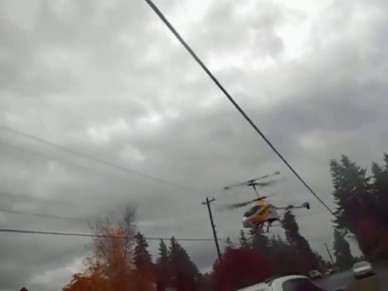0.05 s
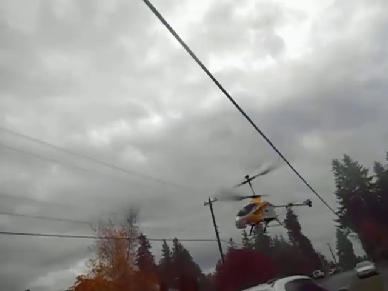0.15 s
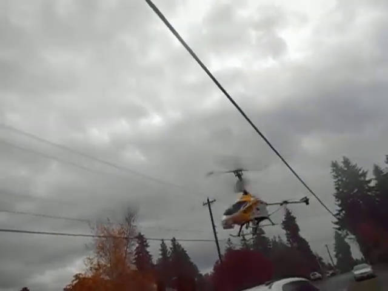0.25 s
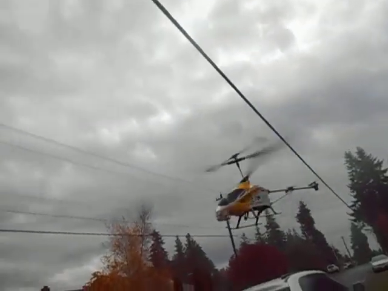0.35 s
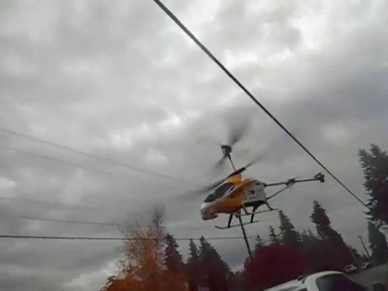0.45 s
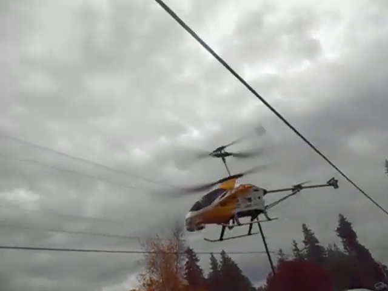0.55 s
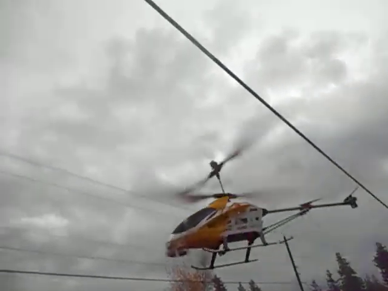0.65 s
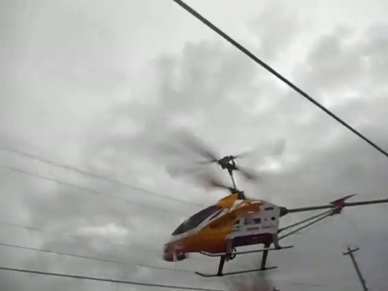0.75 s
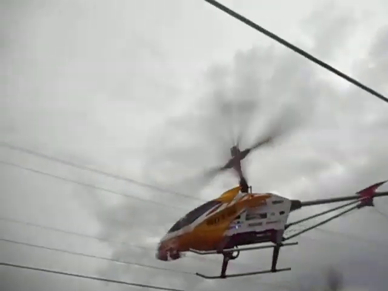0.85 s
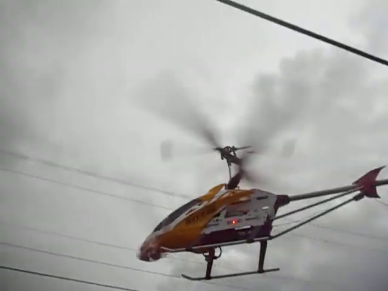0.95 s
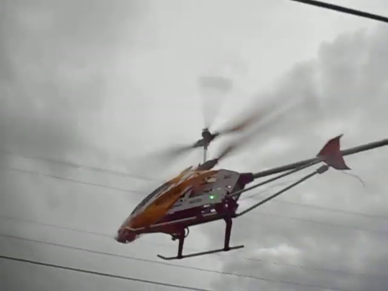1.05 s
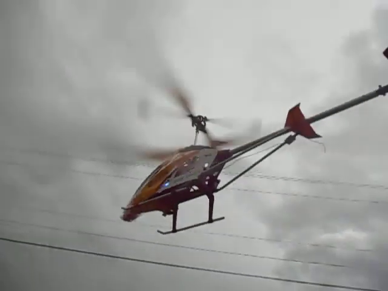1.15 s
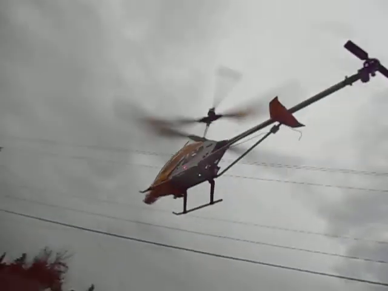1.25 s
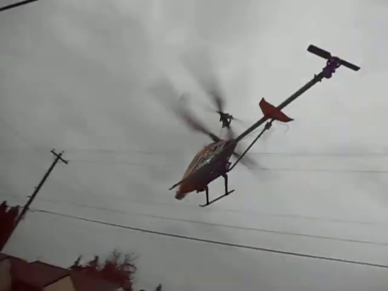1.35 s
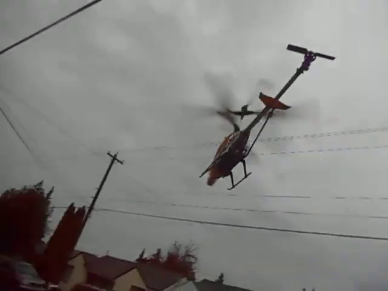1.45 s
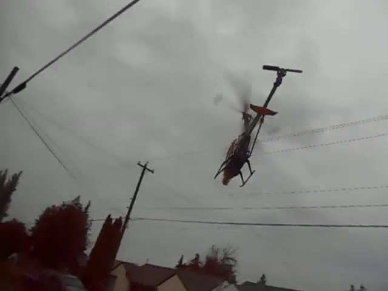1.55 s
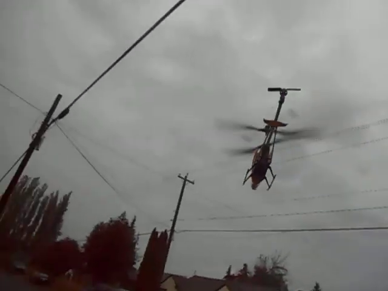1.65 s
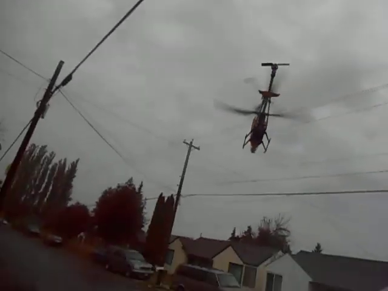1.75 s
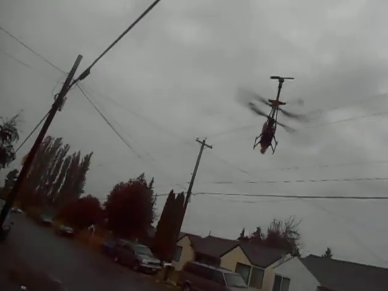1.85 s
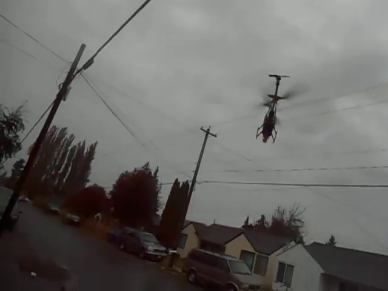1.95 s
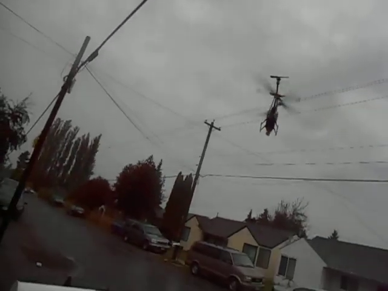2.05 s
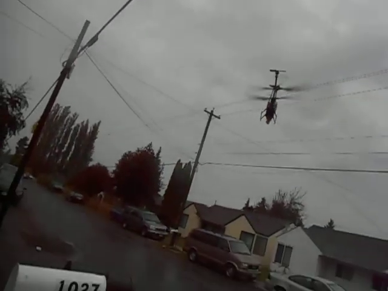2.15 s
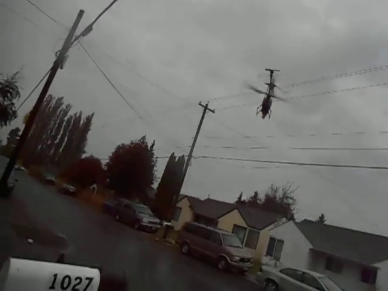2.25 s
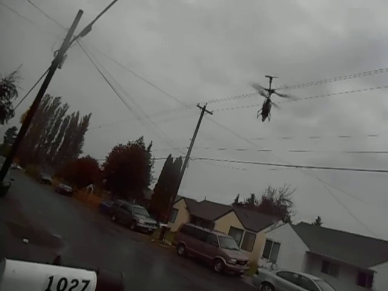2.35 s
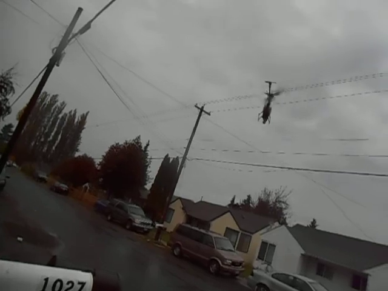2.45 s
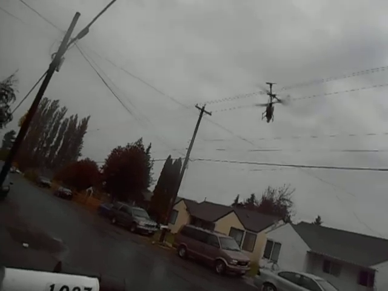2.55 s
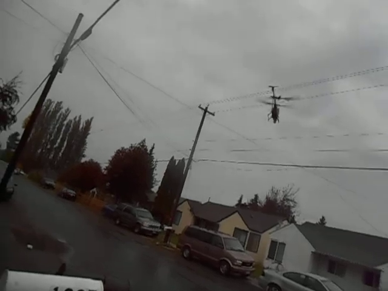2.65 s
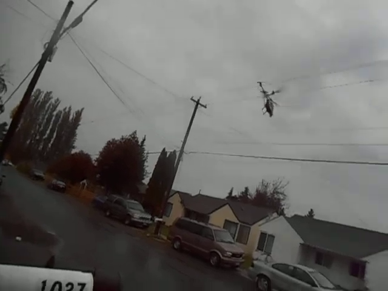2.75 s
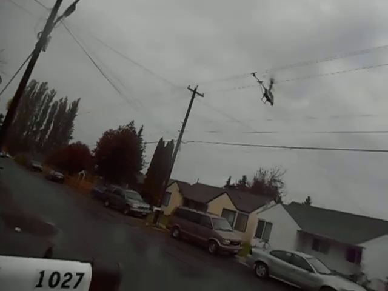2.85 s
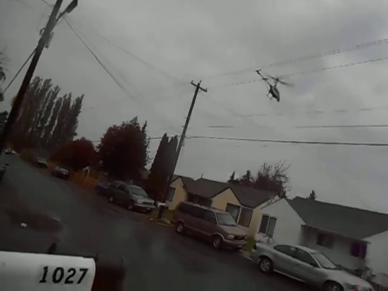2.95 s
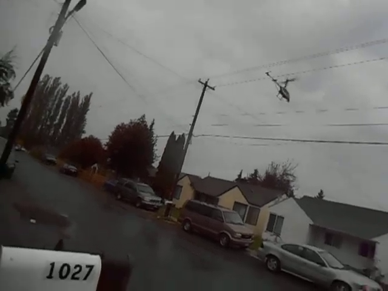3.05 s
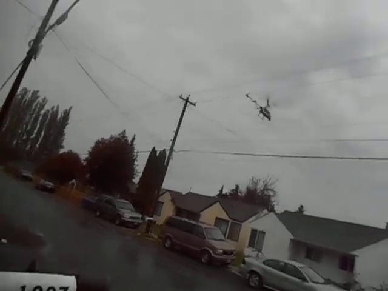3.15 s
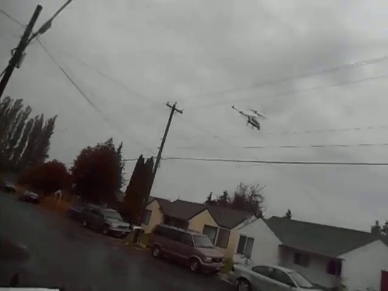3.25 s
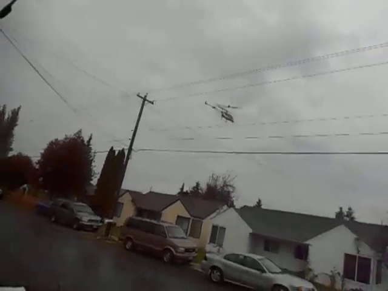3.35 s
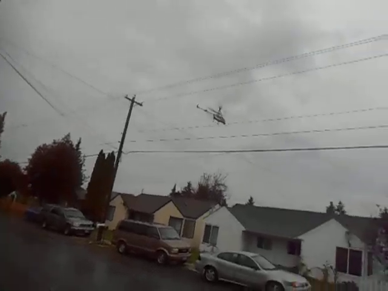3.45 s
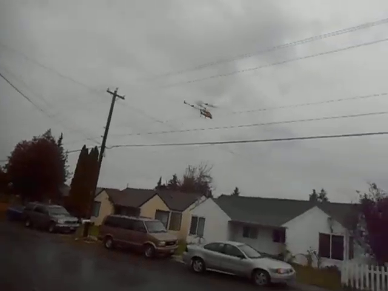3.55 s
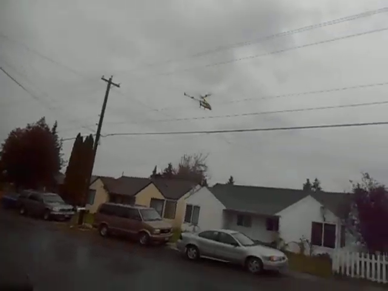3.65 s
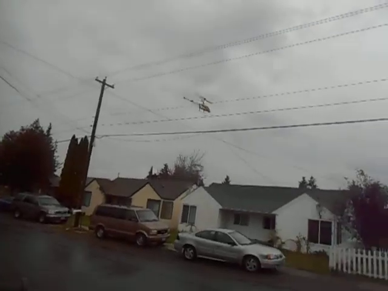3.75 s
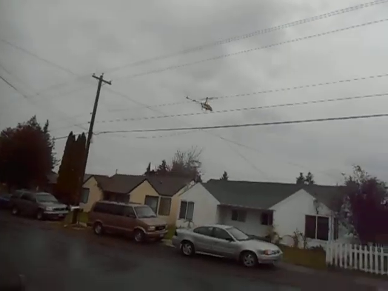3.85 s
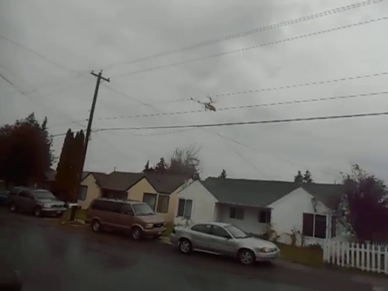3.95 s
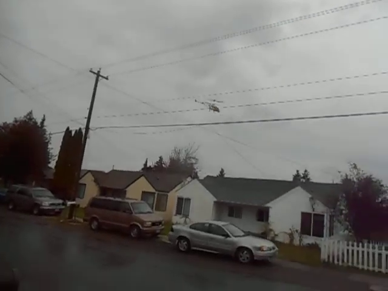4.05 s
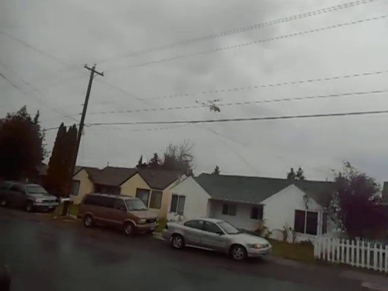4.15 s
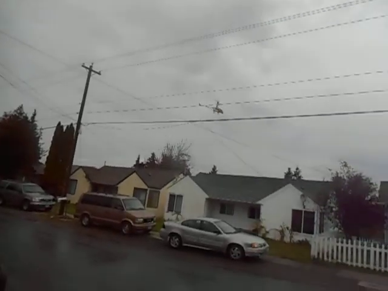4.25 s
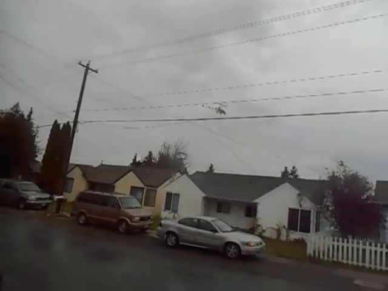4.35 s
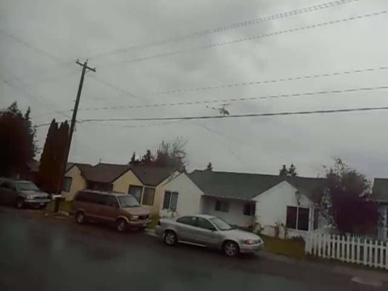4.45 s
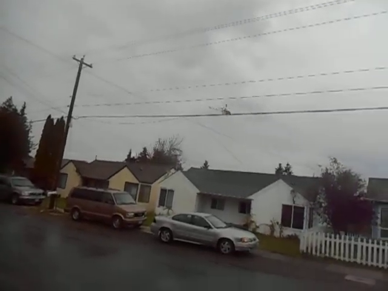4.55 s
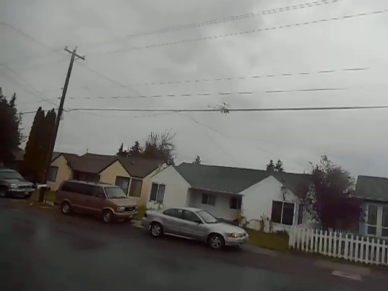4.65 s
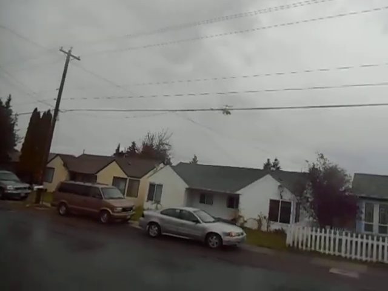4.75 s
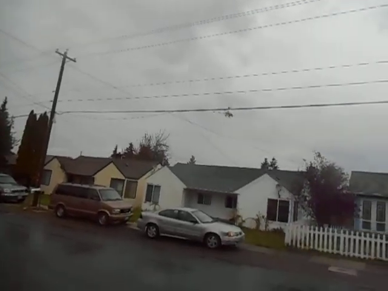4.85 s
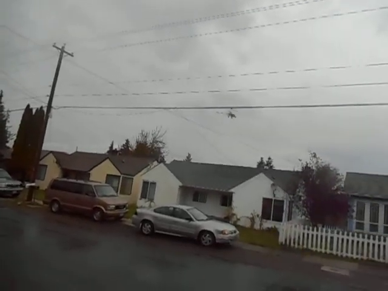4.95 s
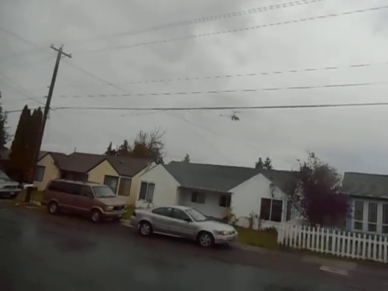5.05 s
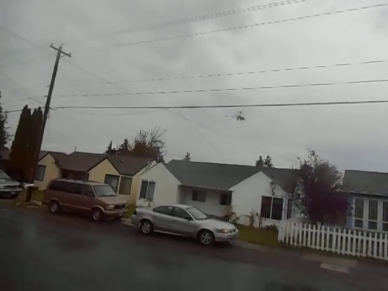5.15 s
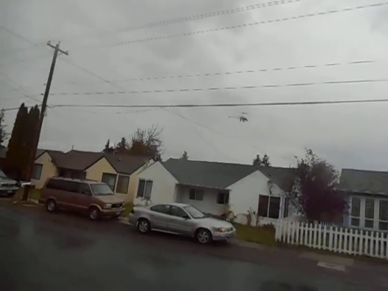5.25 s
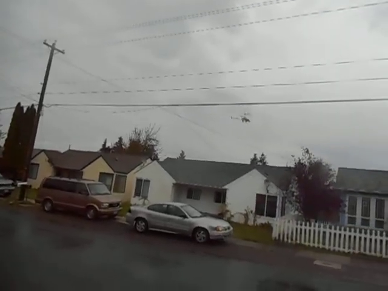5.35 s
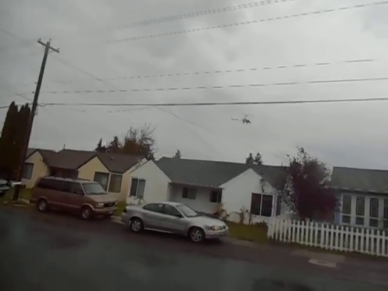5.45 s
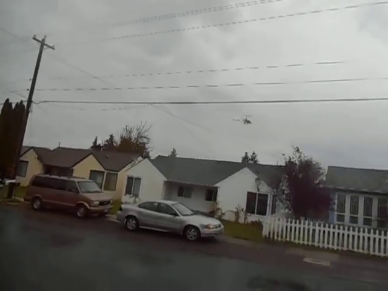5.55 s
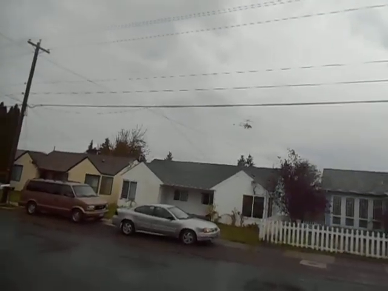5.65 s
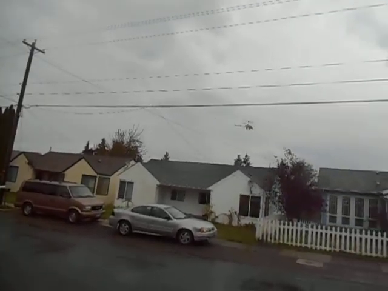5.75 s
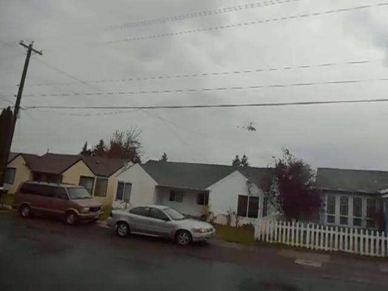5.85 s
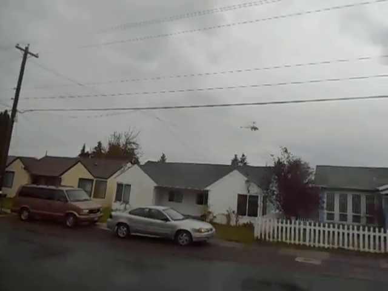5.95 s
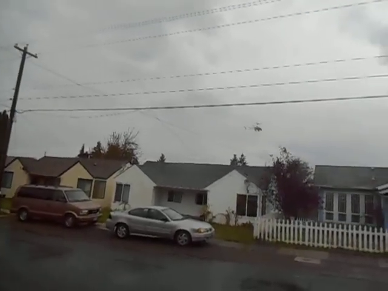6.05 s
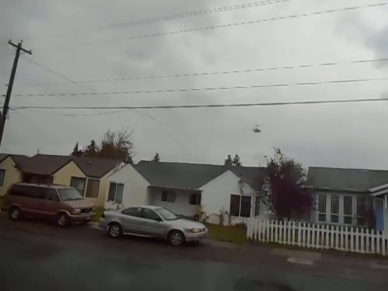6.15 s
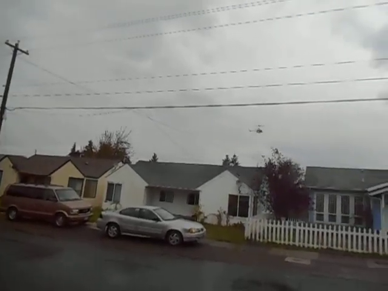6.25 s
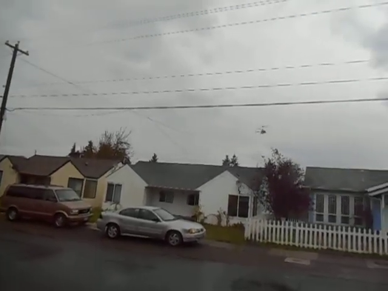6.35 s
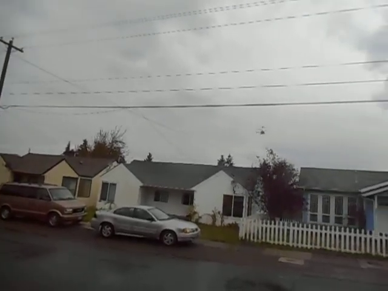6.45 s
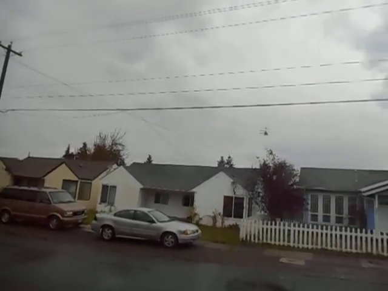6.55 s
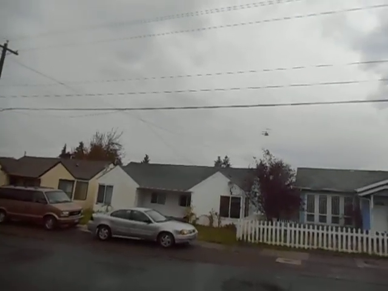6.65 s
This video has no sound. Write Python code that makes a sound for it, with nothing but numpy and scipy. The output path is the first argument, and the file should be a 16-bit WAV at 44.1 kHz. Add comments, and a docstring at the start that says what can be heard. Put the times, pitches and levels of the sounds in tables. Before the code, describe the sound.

A buzzing toy helicopter with two slightly detuned motors flies past a handheld microphone in open air. Bright whine, raspy gear hiss and rapid blade pulses grow, then a burst of low wind thumps nearly overloads the microphone. Afterwards the sound is thinner and fades with distance, wobbling in pitch as it steers. Occasional dry clicks stay close, the busiest cluster past five seconds, over soft street air and faint low hum.

```python
"""A coaxial toy helicopter nears on a quiet street, passes close by at about one second and flies off.
Two geared motors whine as phase-modulated harmonics, over shaped noise for gear hiss and blades pulsing twice a turn.
As it passes, the downwash buffets the microphone with low-passed noise gusts and brief pressure pulses.
Later one motor speeds up as the other slows in each turn, and plastic clicks ring close by as decaying modes.
Near the end a hoarse, wavering tone whistles far off, and a low hum swells twice over the noise of the street air."""
import sys
import numpy as np
from scipy import signal
from scipy.fft import rfft, irfft
from scipy.io import wavfile

SR = 44100
rng = np.random.default_rng(int(sys.argv[2]) if len(sys.argv) > 2 else 0)


def bounce(signal):
    """Save signal as a 16-bit WAV file at the path given by the first command-line argument."""
    frames = np.transpose(np.atleast_2d(signal))
    limited = np.clip(frames, -1, 1)
    pcm = np.round(limited * 32767).astype(np.int16)
    wavfile.write(sys.argv[1], SR, pcm)


N = 295470
T = np.arange(N) / SR  # s
HZ = np.fft.rfftfreq(N, 1 / SR)

PINION_TEETH, WHEEL_TEETH = 8, 115
# Base level of the drive's broad noise: it swells as the helicopter nears, dips just after the pass,
# recovers and fades. Each row: time in seconds, rattle in dB, fizz in dB.
DRIVE = [(0.04, -33, -31.5), (0.3, -35.5, -33), (0.43, -33, -29), (1.06, -31, -25.5), (1.36, -44, -39),
         (1.52, -44.5, -41), (1.67, -38.5, -35.5), (2.26, -35.5, -33.5), (2.43, -36, -32),
         (3.04, -37.5, -34.5), (3.4, -40, -36), (3.47, -40, -33.5), (4.73, -43, -42), (4.81, -42, -40.5),
         (5.59, -43, -41), (6.44, -43.5, -41), (6.49, -46, -44.5), (6.7, -45, -44)]
# Steering: motor A speeds up while B slows, then A drops back to brake the spin.
# Each row: start in seconds, length in seconds, push on A in Hz, brake on A in Hz.
TURNS = [(2.63, .235, 84, 189), (3.095, .259, 56, 160), (4.076, .243, 60, 161), (4.56, .112, 45, 139),
         (5.911, .348, 66, 22), (6.35, .152, 53, 242)]


def gain_of(db):
    """Amplitude follows from level: 20 dB for each factor of ten."""
    return 10 ** (np.asarray(db) / 20)


def evened(x):
    """Normalization by mean power: scales a signal to an rms of one."""
    return x / np.sqrt(np.mean(abs(x) ** 2) + 1e-20)


def curves(rows):
    """Linear interpolation: every column of a time table, sample by sample."""
    s, *columns = np.transpose(rows)
    return [np.interp(T, s, column) for column in columns]


def add(mix, s, sound):
    """Superposition: mixes a sound in at time s."""
    part = mix[round(s * SR):][:len(sound)]
    part += sound[:len(part)]


def noise(spectrum):
    """Spectral shaping: white noise given a colour, interpolated over log frequency, at unit rms."""
    hz, db = np.transpose(spectrum)
    colour = gain_of(np.interp(np.log(HZ + 1), np.log(hz), db))
    return evened(irfft(rfft(rng.standard_normal(N)) * colour, N))


def wander(rate_hz):
    """Low-passed randomness: a smooth fluctuation of unit rms, halved in amplitude at the given rate."""
    return evened(irfft(rfft(rng.standard_normal(N)) / (1 + (HZ / rate_hz) ** 2), N))


def lag(x):
    """Two first-order lags in cascade: the motor's response and the rotor's inertia ease a command."""
    lag_s = 0.028  # each
    keep = np.exp(-1 / (lag_s * SR))
    for _ in range(2):
        x = signal.lfilter([1 - keep], [1, -keep], x)
    return x


def steering():
    """A gated command through the lag: one while a turn is commanded, else zero, with eased edges."""
    return lag(sum(1.0 * ((T >= s) & (T < s + length)) for s, length, *_ in TURNS))


def mesh_angles():
    """Phase is the integral of tooth-meeting rate: one cycle a tooth, for both gears."""
    # Tooth-meeting rates in straight flight.
    # Each row: time in seconds, gear A in Hz, gear B in Hz.
    cruise = [(0, 2449, 2560), (.25, 2473, 2576), (.8, 2467, 2585), (1.3, 2459, 2571), (2.4, 2447, 2558),
              (3.8, 2448, 2568), (5.4, 2490, 2545), (6.7, 2488, 2540)]
    turn_sag_hz, brake_fade_s = 149.9, 0.31  # how far B slows; how soon A's brake lets go
    cruise_a, cruise_b = curves(cruise)
    trim = np.zeros(N)
    # every command replaces the last
    for s, length, push_hz, brake_hz in TURNS:
        since_end = T[T >= s] - s - length
        brake = -brake_hz * np.exp(-since_end / brake_fade_s)
        trim[T >= s] = np.where(since_end < 0, push_hz, brake)
    rates = [cruise_a + lag(trim), cruise_b - turn_sag_hz * steering()]
    return 2 * np.pi * np.cumsum(rates, axis=1) / SR


def motor(teeth, side, sway=0.51, runout=0.26, jitter=0.16, flicker=0.11, shaft_jitter=0.57, overtone_db=-17):
    """Phase modulation of gear harmonics: blades load it twice a turn, the wheel runs out, loose teeth rattle."""
    # Gear harmonics. Each row: multiple of the tooth rate, gear A in dB, gear B in dB,
    # rattling skirt in dB relative to its tone, skirt width in Hz.
    mesh = [(1, -2.5, -5.5, -8.5, 71), (2, -2, -12, -8, 190), (3, -1, -7.5, -7, 186)]
    # Other motor tones. Each row: multiple of the shaft speed, motor A and motor B in dB relative to DRIVE's rattle.
    shaft_tones = [(2.996, -13, -14.5), (5.65, -14.5, -15.5), (6.09, -31, -17), (7.025, -17, -7.5),
                   (8.88, -15.5, -14.5), (11.35, -15, -18), (38, -27.5, -33)]
    # The harmonics beam in different directions. Each row: time in seconds, base level in dB.
    whine_first = [(0.04, -33), (0.93, -29), (1.51, -48), (1.74, -36.5), (2.88, -34.5), (3.08, -41.5),
                   (3.21, -35), (4.12, -38), (4.23, -35), (4.47, -41), (5.12, -37), (5.57, -43),
                   (6.63, -37.5), (6.7, -42)]
    whine_second = [(0, -24.5), (.56, -23), (.69, -29), (1.05, -28.5), (1.17, -21), (1.26, -33), (1.5, -39),
                    (2.15, -32), (2.48, -27.5), (2.8, -25.5), (3.38, -28.5), (3.55, -31.5), (4.3, -35.5),
                    (4.53, -29), (4.62, -39.5), (5.8, -41.5), (6.35, -35.5), (6.7, -44.5)]
    whine_third_a = [(0.04, -19), (0.06, -17.5), (0.5, -21.5), (0.67, -23), (0.78, -21), (1.13, -19.5),
                     (1.24, -32.5), (1.45, -39.5), (2.04, -30), (4.14, -29), (4.29, -33), (4.51, -29),
                     (4.64, -38), (4.81, -33), (6.11, -37.5), (6.48, -32.5), (6.53, -40), (6.7, -41)]
    # Gear B's third lies on the housing's resonance. Each row: time in seconds, base level in dB.
    whine_third_b = [(0.04, -27), (1.11, -30), (1.37, -48), (1.8, -33), (2.86, -27), (2.9, -34),
                     (3.21, -27.5), (4.23, -30.5), (4.4, -45), (5.94, -35), (6.35, -41), (6.48, -36),
                     (6.53, -46), (6.7, -44)]
    # Lead of gear B's lowest tone over A's as the body turns. Each row: time in seconds, lead in dB.
    facing = [(0, -3), (2.8, -2.5), (3.5, -1.5), (4.2, 4.5), (4.9, -5), (6.05, 3), (6.35, 11), (6.7, 2)]

    rotor = teeth / WHEEL_TEETH + rng.uniform(0, 2 * np.pi)
    wobble = sway * np.sin(2 * rotor) + runout * np.sin(rotor) + jitter * wander(36)  # rad
    first_db = curves(whine_first)[0] + (side - 0.5) * curves(facing)[0]
    second_db = curves(whine_second)[0]
    third_db = curves((whine_third_a, whine_third_b)[side])[0]
    out = np.zeros(N)
    for k, (level_db, row) in enumerate(zip([first_db, second_db, third_db], mesh), 1):
        _, a_db, b_db, skirt_db, width_hz = row
        skirt = gain_of(skirt_db) * (wander(width_hz) + 1j * wander(width_hz))
        tone = np.exp(1j * k * (teeth + wobble)) * (1 + flicker * wander(34) + skirt)
        out += gain_of(level_db + (a_db, b_db)[side]) * tone.real
    # a weak fourth harmonic beams like the third
    fourth = np.cos(4 * (teeth + 0.5 * wobble)) * (1 + 0.5 * wander(25))
    out += gain_of(third_db + overtone_db) * fourth
    # the motor's own tones fade with distance like its rattle
    rattle_db = curves(DRIVE)[0]
    for order, *level_db in shaft_tones:
        angle = order / PINION_TEETH * (teeth + shaft_jitter * (wobble + wander(8.1)))
        out += gain_of(rattle_db + level_db[side]) * np.cos(angle) * (1 + 0.4 * wander(25))
    return np.sqrt(2) * out  # sine amplitude for a given rms


def brushes(teeth, buzz_db):
    """A periodic tick is a harmonic comb: faint high partials of the shaft rate come and go."""
    shaft = teeth / PINION_TEETH + 0.048 * wander(11)
    comb = np.zeros(N)
    for k in range(10, 34):
        partial = np.cos(k * shaft + rng.uniform(0, 2 * np.pi))
        comb += partial * np.sin(rng.uniform(1, 3.28) * T + rng.uniform(0, 2 * np.pi))
    return gain_of(buzz_db + curves(DRIVE)[0]) * 2 * comb


def chop(teeth, depth, uneven=0):
    """Amplitude modulation at blade passage, two swells a turn; an uneven pair makes one stronger."""
    rotor = teeth / WHEEL_TEETH + rng.uniform(0, 2 * np.pi)
    return evened(np.exp(depth * np.cos(2 * rotor) + uneven * (np.cos(rotor) + np.cos(3 * rotor))))


def with_drive(db, follow):
    """Level tracking: a gain that swells and fades with the rattle, by follow dB for each dB."""
    rattle_db = curves(DRIVE)[0]
    return gain_of(db + follow * (rattle_db - rattle_db.mean()))


def drive_noise(a, b, rattle_gain_db=5.5, ring_gain_db=1.0, fizz_gain_db=2.0):
    """Friction noise: sliding teeth and brushes rattle, fizz and ring the housing, pulsing with blade load."""
    # Noise colours. Each row: frequency in Hz, relative level in dB.
    rattle_colour = [(1400, -17), (1750, -13.5), (2250, 1), (2850, -1), (3200, -3), (3900, -2), (4400, 3.5),
                     (5400, 1), (6400, -0.5), (7200, 2.5), (8600, -2.5), (10500, -51)]
    fizz_colour = [(6300, -22.5), (7400, -1), (8600, -1), (9300, 0), (10150, 0), (10550, -11),
                   (10950, -19.5), (11300, -25), (11750, -18), (12100, -35), (12500, -40)]
    rattle_db, fizz_db = curves(DRIVE)
    ring = noise([(6700, -33.5), (7450, -4.0), (7780, 6), (8100, 2.0), (8450, -2.5), (9200, -49)])
    treble = gain_of(ring_gain_db) * ring + gain_of(fizz_gain_db) * noise(fizz_colour)
    rattle = gain_of(rattle_db + rattle_gain_db) * noise(rattle_colour)
    hiss = rattle + gain_of(fizz_db) * treble
    return hiss * chop(a, depth=0.081) * chop(b, depth=0.097)


def gear_rub(a):
    """Periodic friction: the wheel's high spot rasps on the pinion once a turn, mostly from near by."""
    # Noise colour of the rasp. Each row: frequency in Hz, relative level in dB.
    rub_colour = [(1400, -47), (1650, -12.5), (1780, -7), (1900, -3), (2020, -5.5), (2200, 2.5),
                  (2400, -18), (2900, -22), (3400, -25)]
    rasp = chop(a, depth=0.45, uneven=0.75)
    return with_drive(db=-48, follow=1.6) * noise(rub_colour) * rasp


def blades(a, b, throb_db=-42):
    """Blade-passage sound: both rotors swish in pulses, and a harmonic throb falls as one over distance."""
    # Noise colour of the swish. Each row: frequency in Hz, relative level in dB.
    swish_colour = [(30, -20), (200, -20), (420, -5.5), (580, -0.5), (1050, 1), (1400, -3.5), (1800, 5),
                    (2600, -12.5), (5000, -37)]
    # Throb partials. Each row: multiple of the rotor speed, relative level in dB.
    blade_orders = [(2, -14), (4, -3), (6, -4.5), (8, -3), (10, -13), (12, -7)]
    closest_s, closest_m, speed_m_per_s = 1.15, 1.0, 4.5
    distance_m = np.hypot(closest_m, speed_m_per_s * (T - closest_s))
    swish = with_drive(db=-46.5, follow=1.46) * noise(swish_colour)
    swish = swish * chop(a, depth=0.06, uneven=0.078) * chop(b, depth=0.08, uneven=0.04)
    throb = np.zeros(N)
    for order, db in blade_orders:
        partial = np.cos(order * a / WHEEL_TEETH + rng.uniform(0, 2 * np.pi))
        throb += gain_of(db) * partial * (1 + 0.25 * wander(5.9))
    return swish + gain_of(throb_db) / distance_m * throb


def downwash(lumpy_db=4.0, lump_hz=22):
    """Turbulent pressure on the microphone: lumpy gusts rumble; each strong eddy is a push, a suction, a crackle."""
    # Noise colours of gust and crackle. Each row: frequency in Hz, relative level in dB.
    gust_colour = [(15, 2.5), (40, 1.5), (85, 5), (140, -6.5), (250, -11), (450, -12.5), (700, -23),
                   (1200, -35), (2500, -59), (5000, -75)]
    crackle_colour = [(60, -11), (200, -1.5), (500, 0), (900, -6.5), (1700, -12), (3000, -26), (6000, -39)]
    # Gusts. Each row: start in seconds, hold in seconds, level in dB before the low-pass, its corner in Hz.
    gusts = [(.33, 0.15, -50, 55), (0.723, 0.15, -43.5, 60), (1.178, 0.04, -21.5, 3000),
             (1.282, .09, -21, 1300), (1.58, .01, -41.5, 70)]
    # Strong eddies. Each row: time in seconds, push in dB, push time constant in seconds, crackle in dB.
    eddies = [(1.175, -17, .0021, -11), (1.191, 0, 0.00097, -12.5), (1.22, -24, .0019, -22),
              (1.276, -23, .0047, -22), (1.286, -6, 0.0013, -15.5), (1.307, -8, 0.0012, -41),
              (1.345, -19, 0.0013, -20.5), (1.394, -17, 0.0022, -40)]
    attack_s, release_s = 0.023, 0.09
    out = np.zeros(N)
    rumble = noise(gust_colour) * gain_of(lumpy_db * np.tanh(wander(lump_hz)))
    for s, hold, db, top_hz in gusts:
        rise = np.minimum(T - s, 0) / attack_s
        fall = (np.maximum(T - s - hold, 0) / release_s) ** 2
        low_pass = signal.butter(2, top_hz, fs=SR, output="sos")
        out += gain_of(db) * np.exp(rise - fall) * signal.sosfilt(low_pass, rumble)
    t, crackle = T[:SR // 20], noise(crackle_colour)
    for s, push_db, length, crackle_db in eddies:
        u = t / length
        add(out, s, gain_of(push_db) * np.pi * u * (1 - u / 2) * np.exp(-u))  # turns to suction at u = 2
        burst = crackle[round(s * SR):][:len(t)] * (1 - np.exp(-t / 0.00027)) * np.exp(-t / 0.0062)
        add(out, s, gain_of(crackle_db) * burst)
    return out


def clicks():
    """Modal impact: a short snap and the quick ring of a plastic shell, struck again as it rebounds."""
    # Clicks. Each row: start in seconds, ring in dB, snap in dB.
    strikes = [(2.5556, -28, -31), (2.9953, -25.5, -29), (4.469, -34.5, -50), (5.3178, -22, -21.5),
               (5.3362, -21, -19), (5.3821, -26.5, -27), (5.9369, -30, -30)]
    # Modes of the plastic. Each row: frequency in Hz, relative level in dB, 60 dB decay time in seconds.
    plastic = [(420, -20, 0.1), (550, -1, 0.011), (1030, -7, 0.019), (1368, 2, 0.038), (1760, -5, 0.016),
               (2540, 1, 0.031), (2980, 4, 0.0088), (3360, -4.5, 0.015)]
    rebound_s, rebound_db = 0.00347, -9
    out, t = np.zeros(N), T[:SR // 16]
    snap = noise([(100, -12), (400, -12.0), (1200, 14), (3000, -9), (5000, 2), (8000, 3), (11000, -25)])
    onset = 1 - np.exp(-t / 0.00044)
    for start, ring_db, snap_db in strikes:
        for s, blow_db in [(start, 0), (start + rebound_s, rebound_db)]:
            ring = sum(gain_of(db - 60 * t / t60) * np.sin(2 * np.pi * (hz * t + rng.random()))
                       for hz, db, t60 in plastic)
            crack = snap[round(s * SR):][:len(t)] * np.exp(-t / 0.0037)
            blow = gain_of(ring_db) * ring + gain_of(snap_db) * crack
            add(out, s, gain_of(blow_db) * blow * onset)
    return signal.sosfilt(signal.butter(2, 250, "high", fs=SR, output="sos"), out)


def whistle(width_hz=130, octave_db=-11):
    """Narrow-band modulation: a wavering tone and its octave, clear in the middle and fuzzy at both ends."""
    # Faint whistle far off. Each row: time in seconds, pitch in Hz, level in dB, hoarseness from 0 to 1.
    glide = [(4.63, 900, -60, .8), (4.68, 910, -45, .7), (4.73, 885, -43, .3), (4.77, 990, -44, .2),
             (4.81, 1015, -39, .05), (4.87, 960, -47, .5), (4.97, 1130, -42, .8), (5.1, 1100, -58, .9)]
    hz, db, hoarse = curves(glide)
    sounding = (T > glide[0][0]) & (T < glide[-1][0])
    turn = np.exp(2j * np.pi * np.cumsum(hz) / SR)
    fuzz = np.sqrt(1 - hoarse) + np.sqrt(hoarse / 2) * (wander(width_hz) + 1j * wander(width_hz))
    tone = (fuzz * (turn + gain_of(octave_db) * turn ** 2)).real
    return np.sqrt(2) * gain_of(db) * sounding * tone


def street(air_db=-50):
    """Broadband ambience: steady shaped noise for quiet outdoor air, and a far hum that swells twice."""
    # Noise colour of the air. Each row: frequency in Hz, relative level in dB.
    air_colour = [(20, 7), (90, 3.5), (200, 2), (500, -0.5), (950, 8), (1400, 10), (2500, -5.5),
                  (8000, -71)]
    # Hum far down the street. Each row: peak in seconds, half length in seconds, pitch in Hz, peak in dB.
    hums = [(5.65, .6, 83, -62), (6.63, 0.19, 103, -56.5)]
    hum = np.zeros(N)
    for s, length, hz, db in hums:
        swell = np.exp(-((T - s) / length) ** 2)
        hum += gain_of(db) * swell * np.sin(2 * np.pi * np.cumsum(hz + 3 * wander(8.6)) / SR)
    return gain_of(air_db) * noise(air_colour) + hum


def scene():
    """Superposition of the helicopter and the street, in mono."""
    a, b = mesh_angles()
    motors = motor(a, 0, overtone_db=-19.0) + motor(b, 1, overtone_db=-18.5)
    motors += brushes(a, buzz_db=-19.0) + brushes(b, buzz_db=-20.0)
    gears = drive_noise(a, b) + gear_rub(a)
    return (motors + gears + blades(a, b) + downwash() + clicks() + street() + whistle())[None]


def record(dry):
    """Saturation, then band limiting: the microphone rounds off the strongest buffets before a low-pass."""
    ceiling, edge_hz = 0.68, 12350
    rounded = dry / (1 + (dry / ceiling) ** 6) ** (1 / 6)
    low_pass = signal.firwin(511, edge_hz, window=("kaiser", 9), fs=SR)
    return signal.oaconvolve(rounded, low_pass[None], "same")


dry = scene()
out = record(dry)
bounce(out)
```